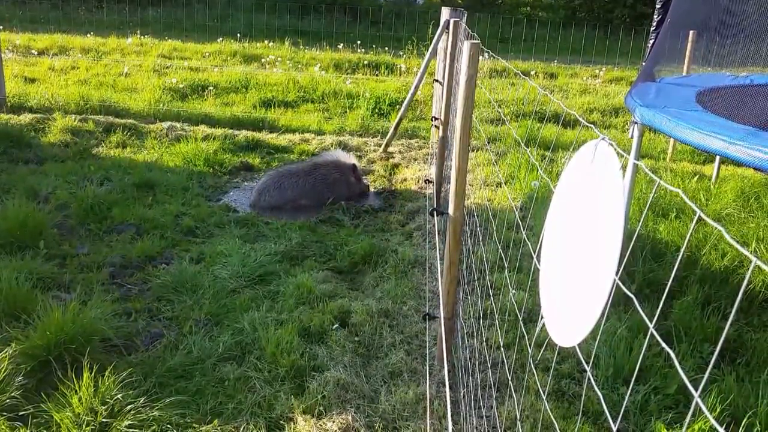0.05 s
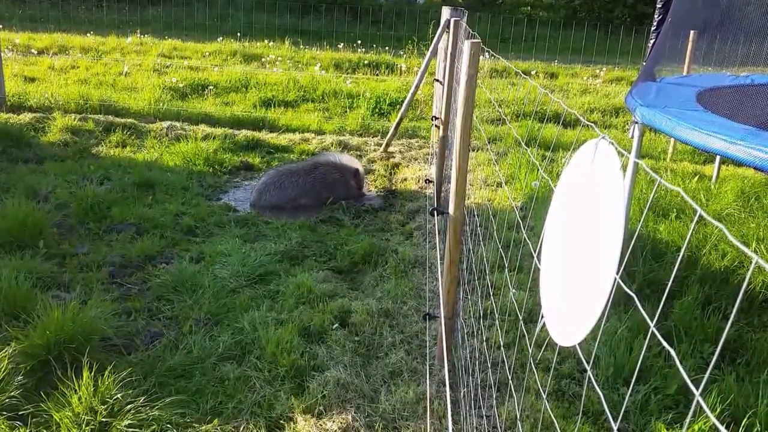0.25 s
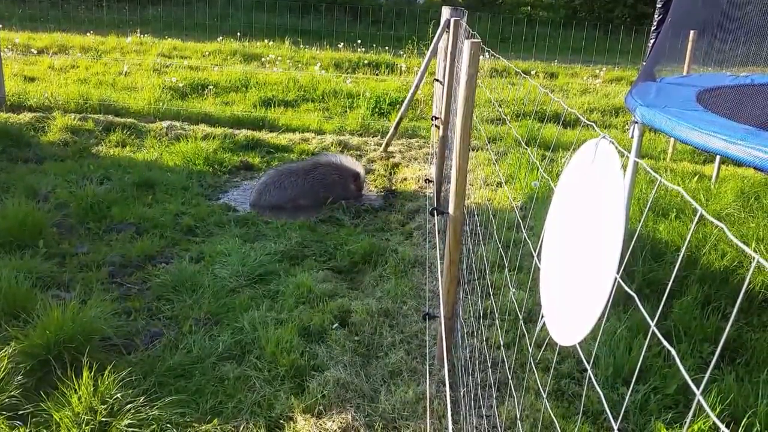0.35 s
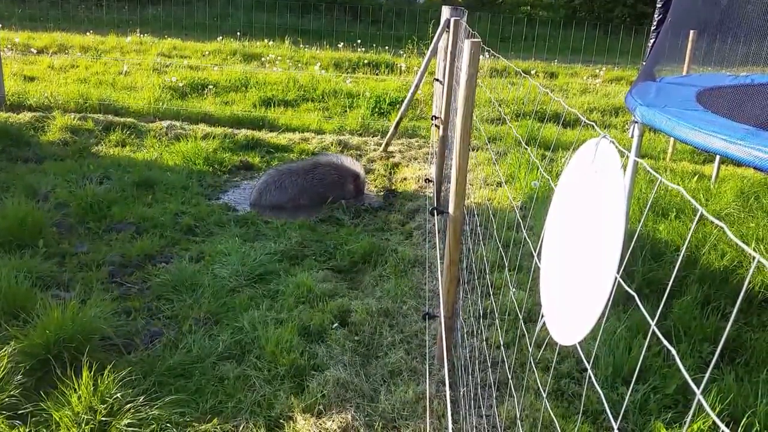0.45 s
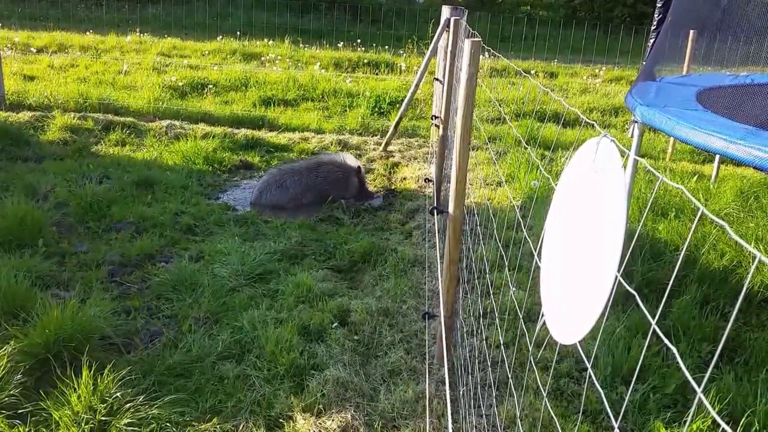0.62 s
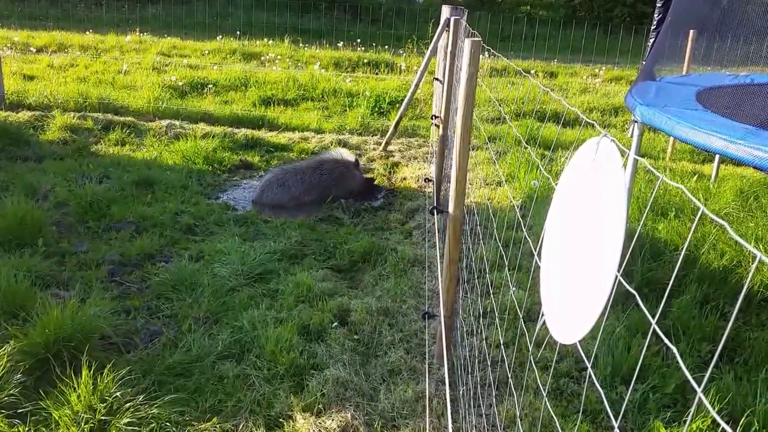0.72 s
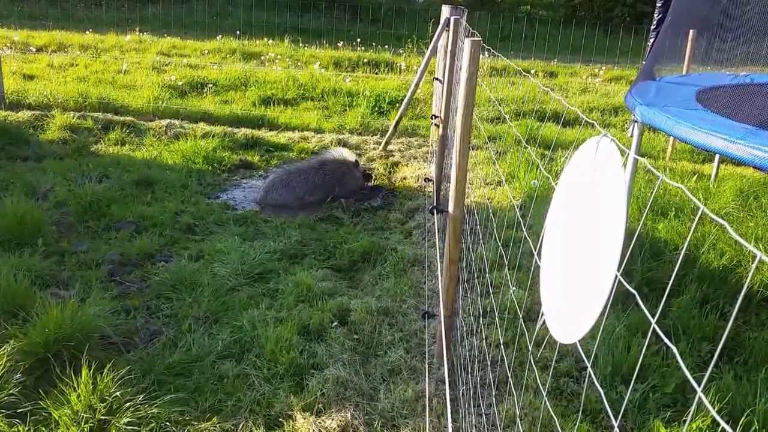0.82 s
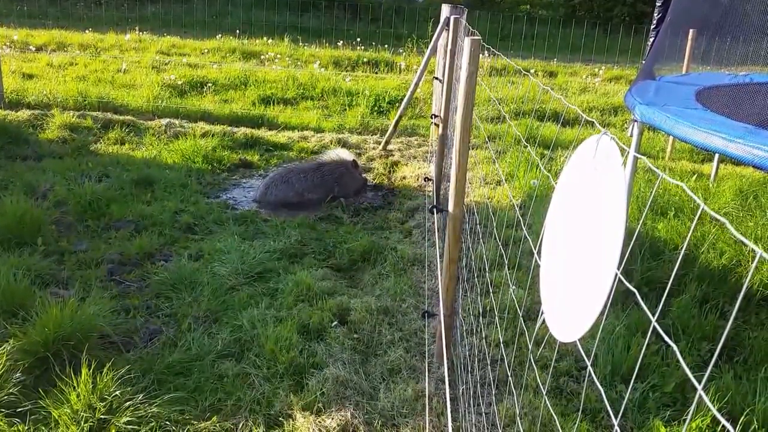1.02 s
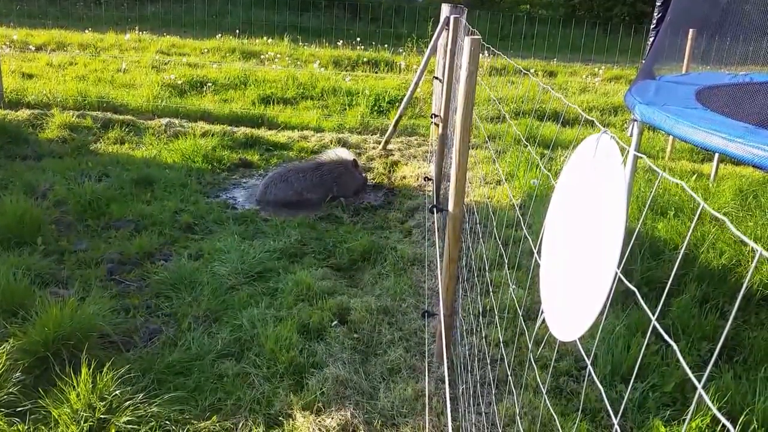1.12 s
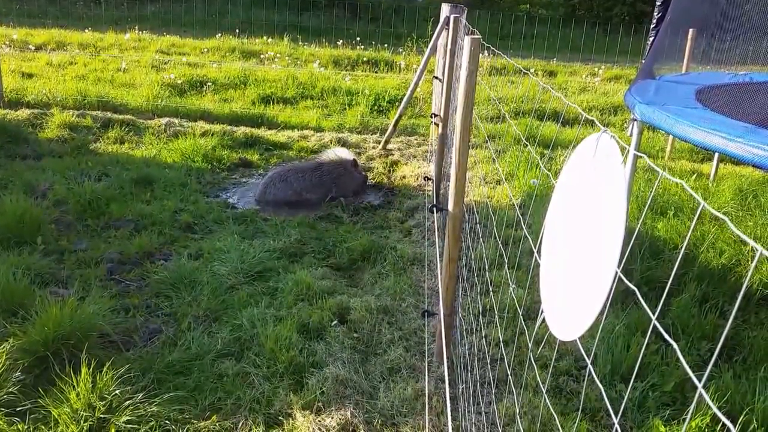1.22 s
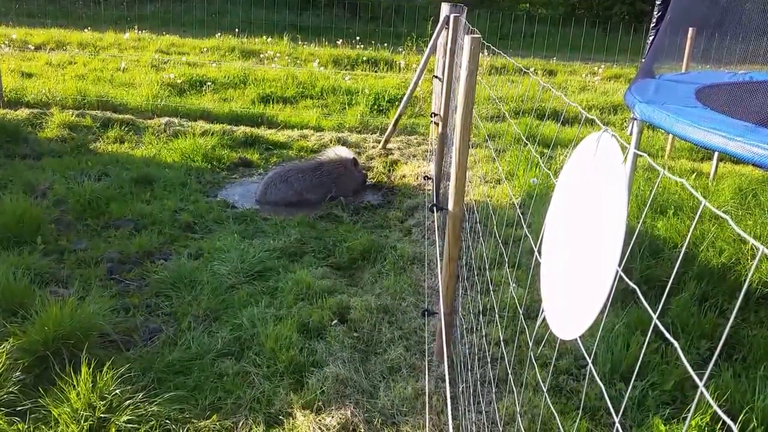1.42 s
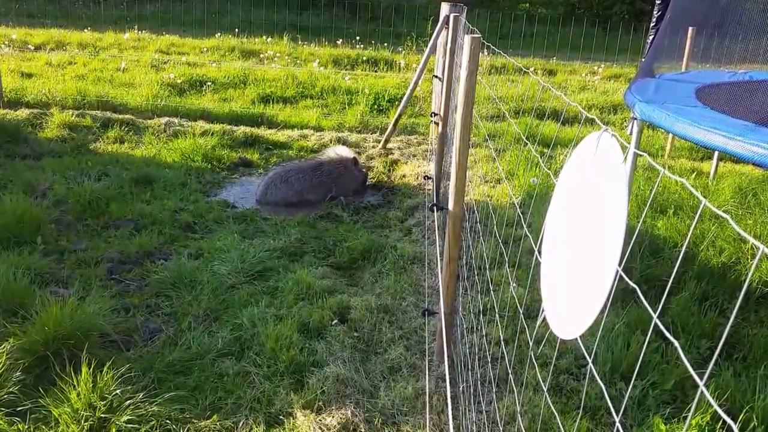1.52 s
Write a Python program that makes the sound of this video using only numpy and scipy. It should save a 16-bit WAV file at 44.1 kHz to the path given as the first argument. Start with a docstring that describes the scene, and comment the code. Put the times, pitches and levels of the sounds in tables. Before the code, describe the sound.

A pig shifts in a muddy puddle some metres away. Wind puffs thump the microphone on the left, its body drags through wet mud, then the water slops twice, bubbles and spatters in a quiet outdoor pen.

```python
"""A pig shifts in a muddy puddle some metres away, in a quiet outdoor pen.
A far bird chirps, puffs of wind begin to thump the left microphone port, and the pig's flank drags
through wet mud. Then the water slops twice, gulps with ringing bubbles, spatters and washes back.
Soft outdoor air, a faint hum and microphone hiss go on throughout."""
import sys
import numpy as np
from scipy import signal
from scipy.fft import rfft, irfft
from scipy.io import wavfile

SR = 44100
rng = np.random.default_rng(int(sys.argv[2]) if len(sys.argv) > 2 else 0)


def pcm_store(signal):
    """Save signal as 16-bit PCM."""
    levels = np.round(np.clip(np.atleast_2d(signal), -1, 1) * 32767)
    wavfile.write(sys.argv[1], SR, levels.astype(np.int16).T)


N = 68355
T, HZ = np.arange(N) / SR, np.fft.rfftfreq(N, 1 / SR)
BAND_EDGE_HZ = 14600


def slop():
    """Amplitude-modulated noise: muddy water churns in lumps, louder the more it moves."""
    # Each row: frequency in Hz, density in dB per Hz before the stir gain.
    spectrum = [(120, -105), (280, -93.5), (500, -85), (850, -91), (1300, -101.5), (2000, -110),
                (4000, -135)]
    lumps = amp(2 * slow(54))
    churn = evened(rng.standard_normal(N) * lumps)
    return from_puddle(colour(churn * stir(column=1), spectrum))


def spatter():
    """Superposition of small impacts: droplets and a fine mist follow the movement of the water."""
    # Each row: frequency in Hz, left and right density in dB per Hz for unit white noise.
    spectrum = [(378, -110, -110), (1300, -95, -99), (2160, -99, -93.5), (2600, -101, -106),
                (3800, -92.5, -104), (5600, -112, -104), (6200, -126, -113), (7020, -123, -108),
                (8400, -140, -122), (10300, -113, -95.5), (12000, -112, -103), (15100, -118, -115)]
    ports = []
    for port in (1, 2):
        spray = amp(-5) * droplets() + amp(-9.5) * rng.standard_normal(N)
        ports.append(colour(spray * stir(column=2), spectrum, column=port))
    return np.array(ports)


def stir(column):
    """Amplitude envelope: the water's movement sets the gain of the slop or the spatter."""
    # Each row: time in seconds, slop gain in dB, spatter gain in dB.
    movement = np.array([(.55, -20.5, -24), (.74, -15, -28), (.77, -10, -12), (0.799, -2, 2.5),
                         (.83, 3, -2.5), (0.861, 9, 4), (.90, -2, 1.5), (.95, -2.5, 2), (1.04, 1, 3.5),
                         (1.08, -2.5, -1), (1.13, -12.5, -4), (1.20, -14.5, -10), (1.31, -10.5, -12.5),
                         (1.41, -2.5, -15), (1.469, -6, -13), (1.54, -24, -23)])
    return amp(np.interp(T, movement[:, 0], movement[:, column]))


def bubbles():
    """Cavity resonance: air pockets ring and rise in pitch as they close."""
    # Each row: start in seconds, level in dB, first pitch in Hz, initial rise in Hz per second,
    # swell time in seconds.
    pockets = [(.781, -43.5, 405, 3000, 0.0021), (.8032, -34.5, 483, 8000, 0.002),
               (.822, -50, 792, 4040, 0.0046), (.8462, -43, 770, 5000, 0.0025),
               (.8502, -41, 503, 9000, .003), (.881, -62, 820, 14200, 0.004),
               (.918, -57.5, 1222, 4960, 0.0037), (.968, -62, 750, 2000, .004),
               (1.000, -41, 310.3, 7020, 0.012), (1.031, -41.5, 420, 3000, 0.0018),
               (1.0506, -47, 493, 9900, 0.0034), (1.063, -55, 833, 38600, .005)]
    glide_s = 0.044
    out, t = np.zeros(N), T[:SR // 10]
    for start, db, hz, rise, peak_s in pockets:
        pitch = hz + rise * glide_s * (1 - np.exp(-t / glide_s))
        add(out, start, amp(db) * swell(t, peak_s, shape=1.41) * tone(pitch))
    return from_puddle(out)


def drag():
    """Friction noise: wet mud gives a low smear and a high fizz under the pig's flank."""
    # Each row: time in seconds, smear gain in dB, fizz gain in dB.
    stroke = [(.25, -14, -37.5), (0.409, -11, -19), (.48, -10.5, 2.5), (.54, -17, -5), (.59, -5.5, -2),
              (.645, -5.5, 2.5), (0.689, -6.5, -9.5), (0.736, 3, -1), (.78, -9, 2), (.85, -11.5, -16),
              (1.1, -32, -35)]
    # Each row of both: frequency in Hz, density in dB per Hz before the stroke's gain.
    smear_spectrum = [(120, -101.5), (250, -77.5), (480, -83), (700, -100), (1200, -125)]
    fizz_spectrum = [(4000, -145), (9000, -135), (10200, -109), (11500, -113), (14000, -126)]
    times, smear_db, fizz_db = np.transpose(stroke)
    smear = colour(rng.standard_normal(N) * amp(np.interp(T, times, smear_db)), smear_spectrum)
    spray = evened(droplets() + amp(5.5) * rng.standard_normal(N))
    fizz = colour(spray * amp(np.interp(T, times, fizz_db)), fizz_spectrum)
    return from_puddle(smear) + np.array([amp(-13.5) * fizz, fizz])


def droplets(bands=22, per_band_per_s=250, spread_db=3.5):
    """Shot noise: a random impulse train in each band makes tiny pings, white overall."""
    band_position = np.interp(np.sqrt(HZ), np.sqrt([400, BAND_EDGE_HZ]), [0, bands - 1])
    spectrum = 0
    for band in range(bands):
        sizes = amp(spread_db * np.minimum(rng.exponential(1, N), 4)) * rng.choice([-1, 1], N)
        train = evened(sizes * (rng.random(N) < per_band_per_s / SR))
        passband = np.cos(np.pi / 2 * np.clip(band_position - band, -1, 1))
        spectrum = spectrum + rfft(train) * passband
    return irfft(spectrum, N)


def drops():
    """Damped oscillation: drops of mud land with high, thin ticks, mostly on the right."""
    # Each row: start in seconds, level on the right in dB, pitch in Hz.
    landings = [(.181, -65, 10600), (0.198, -71, 10400), (.375, -73, 11200), (0.539, -62.5, 11000),
                (0.646, -64, 11000), (.783, -65, 10500), (.7995, -77, 10400), (0.8428, -51, 11900),
                (0.8519, -49, 10400), (0.855, -50, 12500), (.8615, -48, 10650), (.874, -53, 10300),
                (0.877, -54, 11900), (0.9056, -47, 10270), (.9395, -62, 10800), (.979, -55, 10600),
                (1.0325, -58, 12100), (1.0455, -51.5, 12000), (1.1475, -49.5, 10540), (1.146, -57, 12200)]
    waver_hz, left_db = 170, -19
    out, t = np.zeros(N), T[:SR // 50]
    for start, db, hz in landings:
        pitch = hz + waver_hz * slow(1300)[:len(t)]
        add(out, start, amp(db) * swell(t, peak_s=0.00051, shape=0.79) * tone(pitch))
    return from_puddle(out) * np.array([[amp(left_db)], [1]])


def wind():
    """Transient response: the microphone's low cut turns pressure puffs into thumps, over a rumble."""
    # Each row: time in seconds, pressure scale in dB, rise and fall time constants in seconds,
    # push (+1) or pull (-1), turbulence gain in dB.
    puffs = [(0.2087, 8, 0.0013, 0.0016, -1, 1.5), (.2287, 2, 0.0024, 0.0011, 1, 6.5),
             (0.2417, 3.5, 0.004, 0.0034, 1, -15), (.262, -1.5, 0.0038, 0.0067, -1, -13.5),
             (.317, -23.5, 0.0014, 0.0018, -1, 3), (.594, -1.5, .0023, 0.0033, -1, -9.5),
             (0.65, -7, .0018, 0.0037, -1, -10), (0.657, -24, 0.0016, 0.0025, 1, -2),
             (0.7141, -9, 0.0016, 0.0043, 1, -8), (1.27, -14, 0.00075, 0.0015, 1, 2)]
    # Each row: frequency in Hz, density in dB per Hz relative to the puff, before its turbulence gain.
    turbulence = [(100, -60), (280, -78.5), (400, -52), (560, -70.5), (800, -87.5), (1400, -91),
                  (2500, -115), (5000, -138)]
    # Each row: frequency in Hz, density at the left port in dB per Hz.
    rumble = [(10, -68.5), (35, -66.5), (100, -89.5), (250, -100), (800, -130)]
    low_cut_hz, low_cut_q, right_db = 84.7, 1.435, -33.5
    pressure, eddies = np.zeros(N), colour(rng.standard_normal(N), turbulence)
    for time, db, rise, fall, direction, rough_db in puffs:
        bump = np.exp(-np.logaddexp((time - T) / rise, (T - time) / fall))
        pressure += direction * amp(db) * bump * (1 + amp(rough_db) * eddies)
    p = 1j * HZ / low_cut_hz
    high_pass = p / (p + 1) * p ** 2 / (p ** 2 + p / low_cut_q + 1)
    thumps = irfft(rfft(pressure) * high_pass, N)
    return np.array([thumps + colour(rng.standard_normal(N), rumble), amp(right_db) * thumps])


def bird():
    """Linear frequency sweep: one faint rising chirp, far off to the right."""
    start_s, db, first_hz, rise_hz_per_s, length_s = 0.049, -73, 5950, 62000, 0.027
    out, t = np.zeros(N), np.arange(0, length_s, 1 / SR)
    envelope = np.sin(np.pi * t / length_s) ** 2
    cycles = first_hz * t + rise_hz_per_s * t ** 2 / 2
    add(out, start_s, amp(db) * envelope * np.sin(2 * np.pi * cycles))
    return np.array([amp(-9) * out, out])


def background():
    """Partial coherence: the ports share a far hum and the air's bass, but each has its own hiss."""
    # Each row: frequency in Hz, density of the outdoor air in dB per Hz.
    air = [(15, -84), (35, -77), (58, -71), (110, -81), (200, -85), (330, -89), (600, -101), (1000, -111),
           (1600, -115), (3000, -122), (8000, -140)]
    # Each row: frequency in Hz, left-right correlation of the air from -1 to 1.
    likeness = [(60, 1), (230, 0.24), (920, -0.018), (3580, -0.01), (14000, -0.35)]
    # Each row: frequency in Hz, left and right density in dB per Hz.
    hiss = [(500, -120, -120), (1870, -115, -115), (2570, -108, -113), (3212, -96.5, -110),
            (3634, -89, -106), (3990, -95.5, -106), (4380, -107, -108), (4900, -116, -111),
            (5910, -133, -121), (6700, -128, -116), (9000, -140, -134), (11000, -124, -118),
            (11760, -120, -120), (14480, -121, -123)]
    # Each row: frequency of a hum partial in Hz, rms level in dB.
    partials = [(60, -60.5), (183, -66.5), (229, -68.5), (321, -70), (421, -81)]
    waver_hz = 3
    left_air, unrelated, left_hiss, right_hiss = rng.standard_normal((4, N))
    correlation = read(likeness, HZ)
    right_air = irfft(correlation * rfft(left_air) + np.sqrt(1 - correlation ** 2) * rfft(unrelated), N)
    hum = sum(amp(db) * np.sqrt(2) * tone(hz + waver_hz * slow(8.1)) for hz, db in partials)
    left = colour(left_air, air) + colour(left_hiss, hiss, column=1)
    right = colour(right_air, air) + colour(right_hiss, hiss, column=2)
    return hum + np.array([left, right])


def from_puddle(x, left_lag_s=0.00017):
    """Path difference: the puddle's sound reaches the right port just before the left."""
    return np.array([irfft(rfft(x) * np.exp(-2j * np.pi * HZ * left_lag_s), N), x])


def colour(x, table, column=1, size=16384):
    """Minimum-phase filtering: gives unit white noise the table's spectral density."""
    density_db = read(table, abs(np.fft.fftfreq(size, 1 / SR)), column)
    log_gain = np.log(amp(density_db) * np.sqrt(SR / 2))
    taps = np.fft.ifft(np.exp(np.conj(signal.hilbert(log_gain)))).real
    return irfft(rfft(x) * rfft(taps[:size // 2], N), N)


def read(table, hz, column=1):
    """Interpolation of a spectrum table on a log-frequency axis."""
    table = np.array(table, float)
    return np.interp(np.log(hz + 1), np.log(table[:, 0] + 1), table[:, column])


def tone(pitch_hz):
    """A sine whose phase is the integral of its frequency."""
    return np.sin(2 * np.pi * np.cumsum(pitch_hz) / SR)


def swell(t, peak_s, shape):
    """Gamma envelope: rises to 1 at peak_s, then dies away."""
    return (t / peak_s * np.exp(1 - t / peak_s)) ** shape


def slow(rate_hz):
    """Low-passed noise: a smooth random wander of unit rms."""
    return evened(irfft(rfft(rng.standard_normal(N)) * np.exp(-(HZ / rate_hz) ** 2), N))


def evened(x):
    """Normalisation to unit rms."""
    return x / np.sqrt(np.mean(x ** 2) + 1e-20)


def amp(db):
    """Decibels to amplitude ratio."""
    return 10 ** (np.asarray(db) / 20)


def add(mix, start_s, sound):
    """Superposes a sound on the mix from start_s."""
    part = mix[round(start_s * SR):][:len(sound)]
    part += sound[:len(part)]


def scene():
    """Superposition: the puddle, the wind and the quiet pen sum at each port."""
    return drag() + bubbles() + slop() + spatter() + drops() + wind() + bird() + background()


def record(dry):
    """Band limiting: a linear-phase low-pass removes the highest treble."""
    low_pass = signal.firwin(511, BAND_EDGE_HZ, window=("kaiser", 9), fs=SR)
    return signal.oaconvolve(dry, low_pass[None], "same")


dry = scene()
out = record(dry)
pcm_store(out)
```